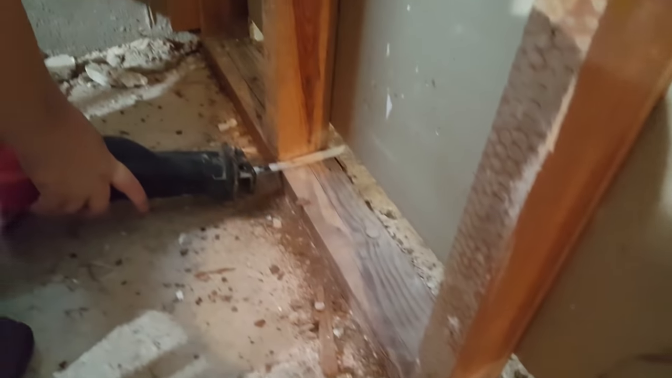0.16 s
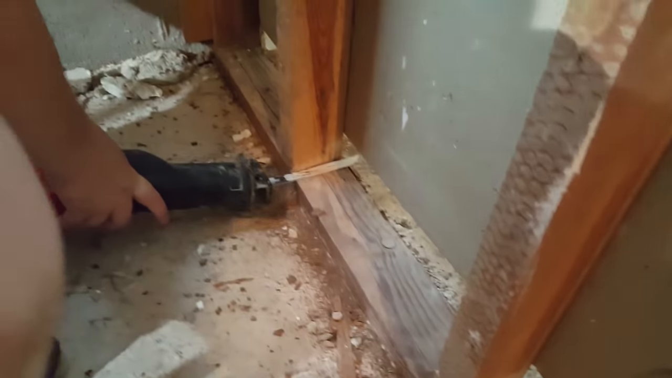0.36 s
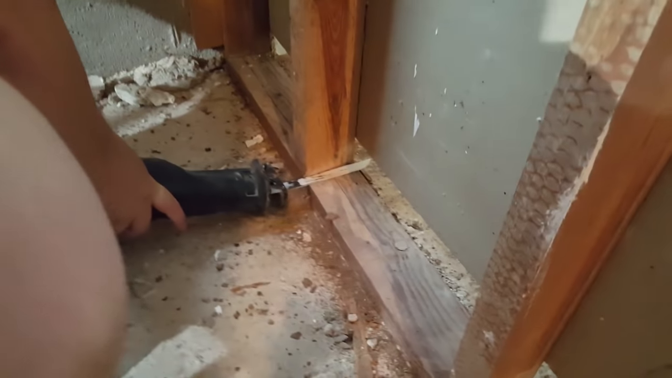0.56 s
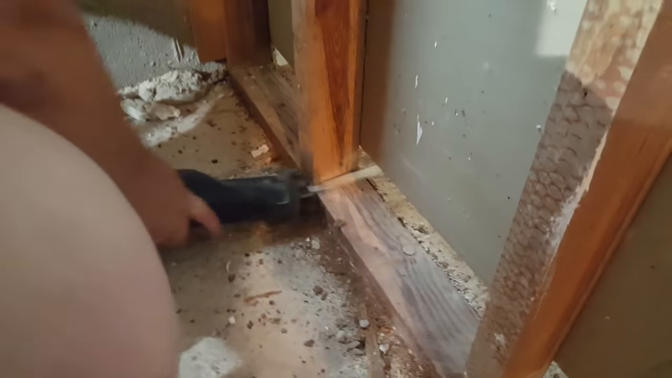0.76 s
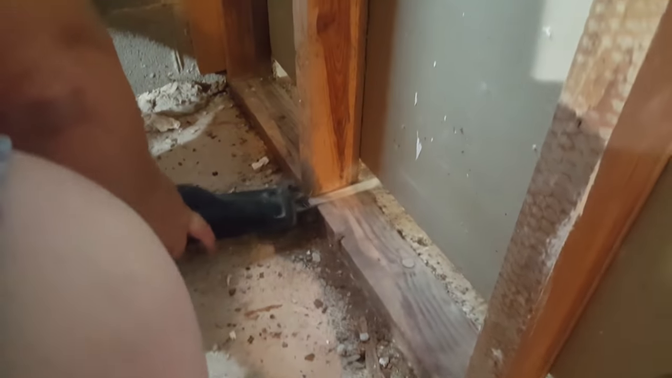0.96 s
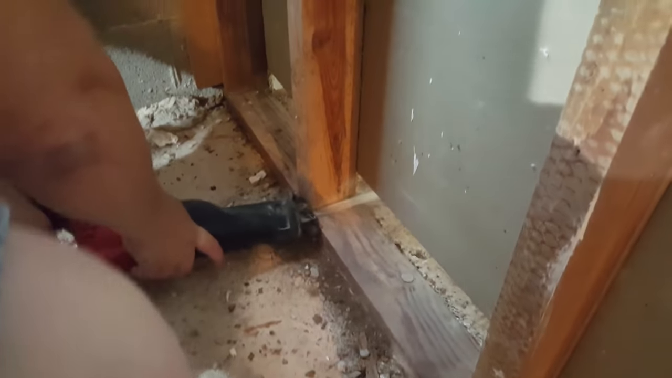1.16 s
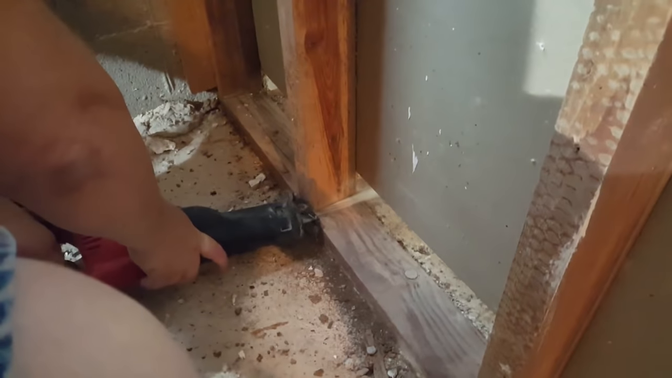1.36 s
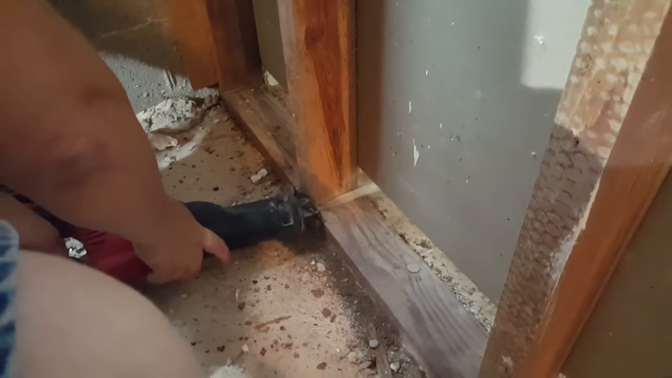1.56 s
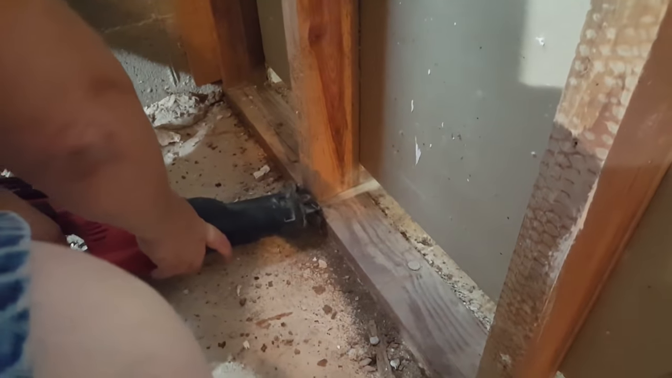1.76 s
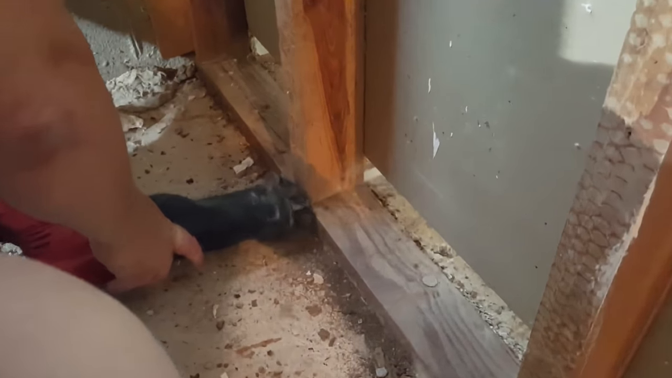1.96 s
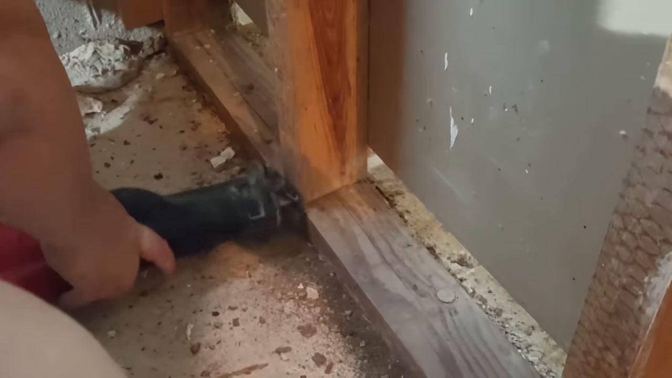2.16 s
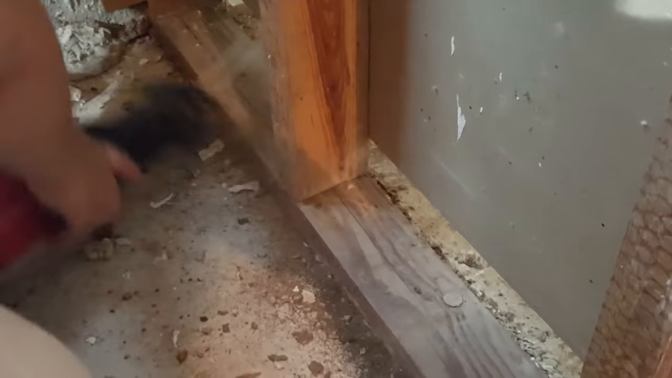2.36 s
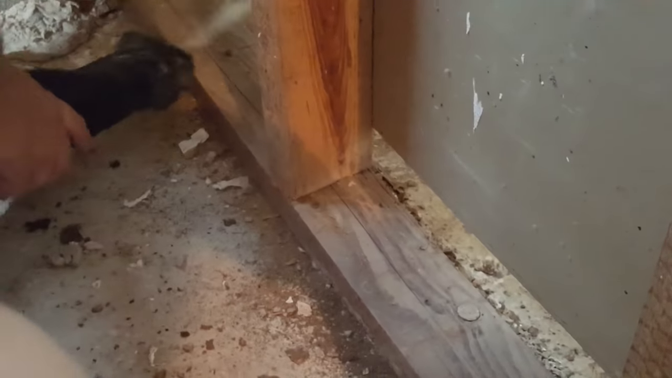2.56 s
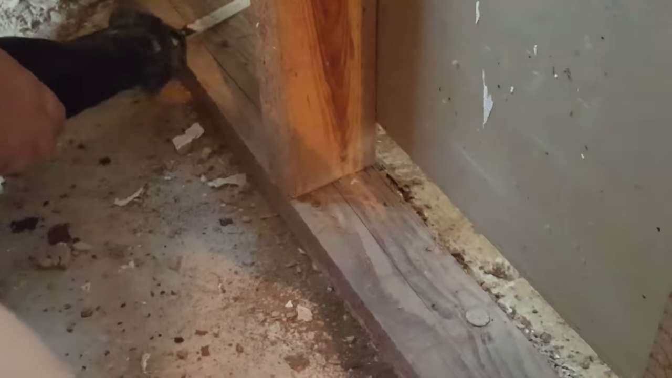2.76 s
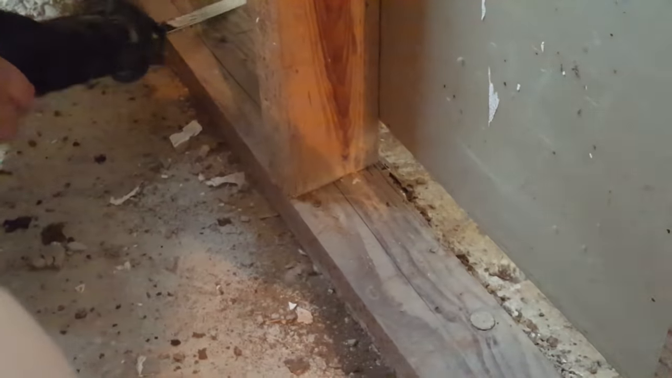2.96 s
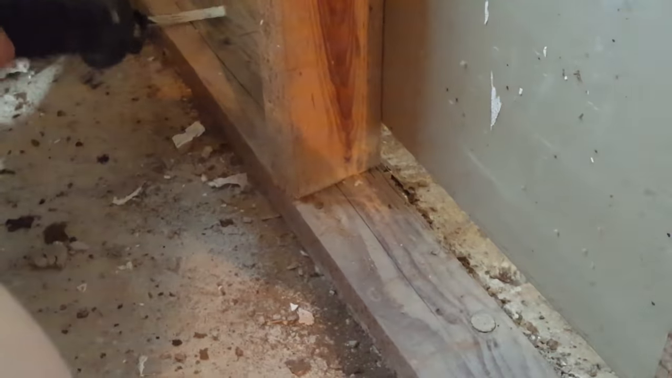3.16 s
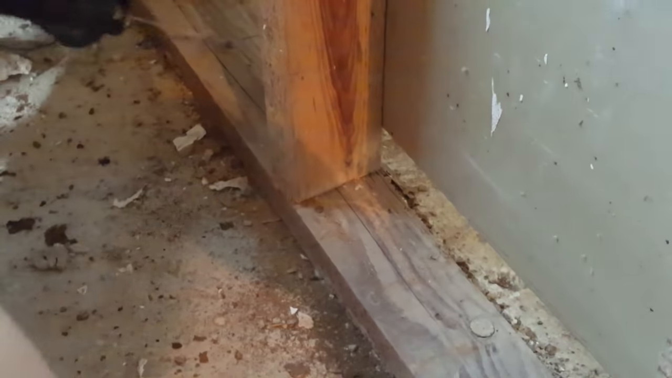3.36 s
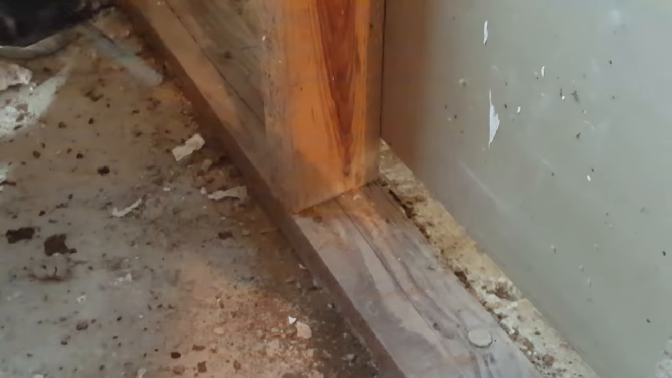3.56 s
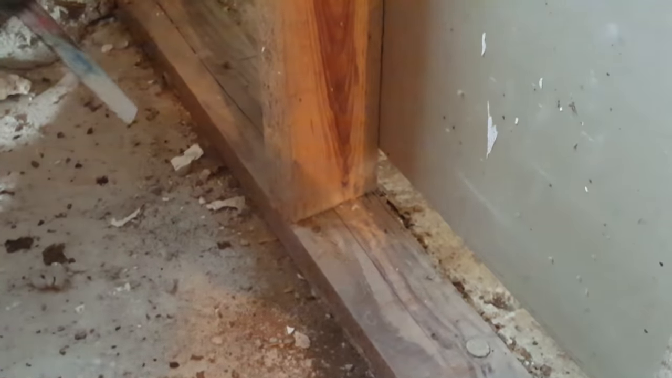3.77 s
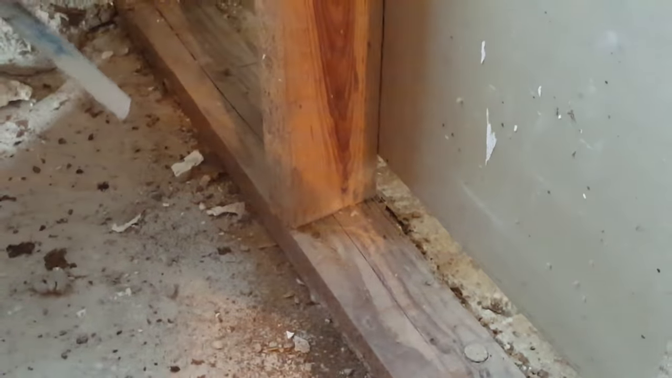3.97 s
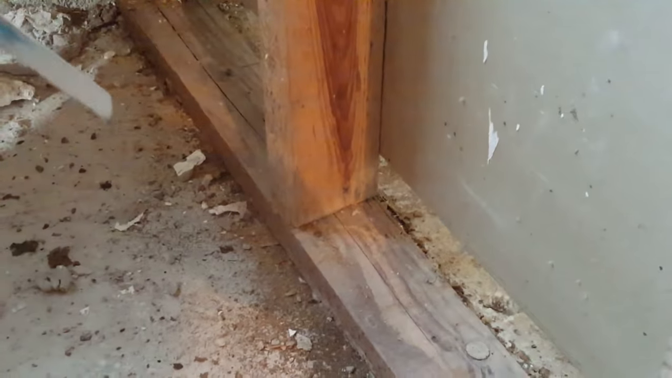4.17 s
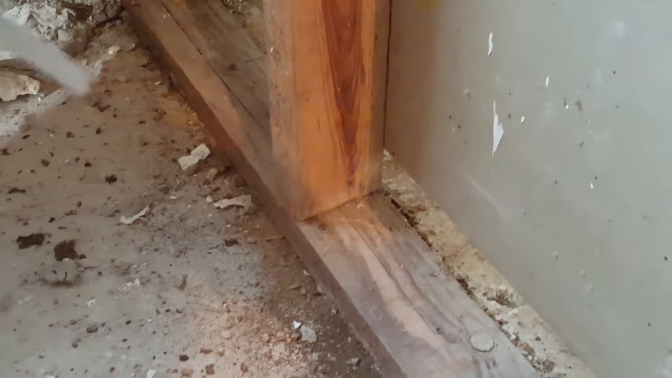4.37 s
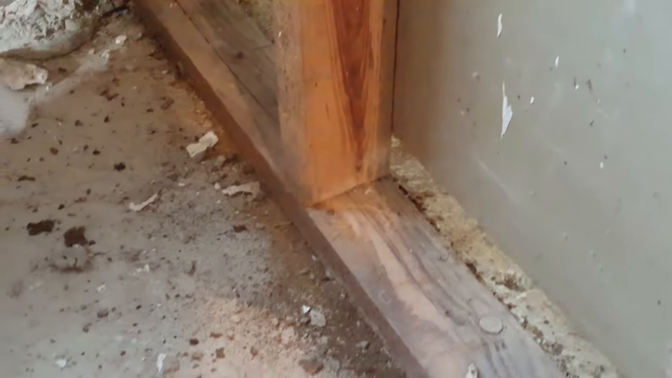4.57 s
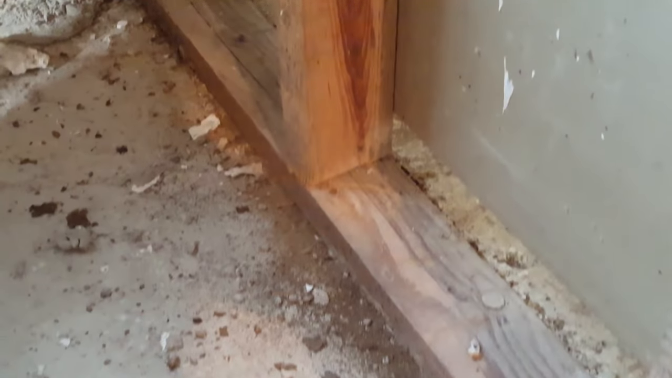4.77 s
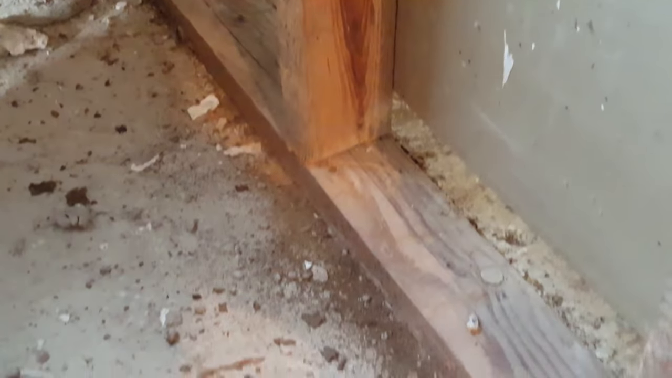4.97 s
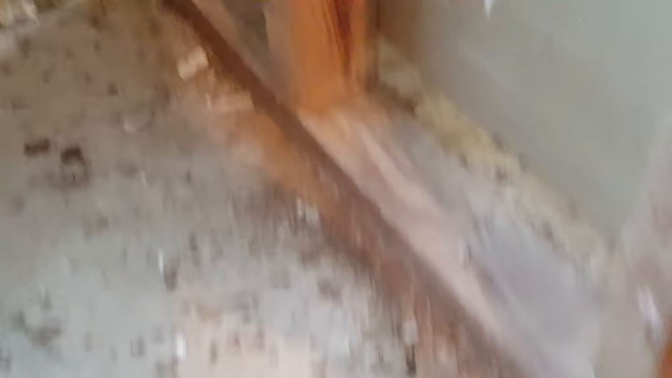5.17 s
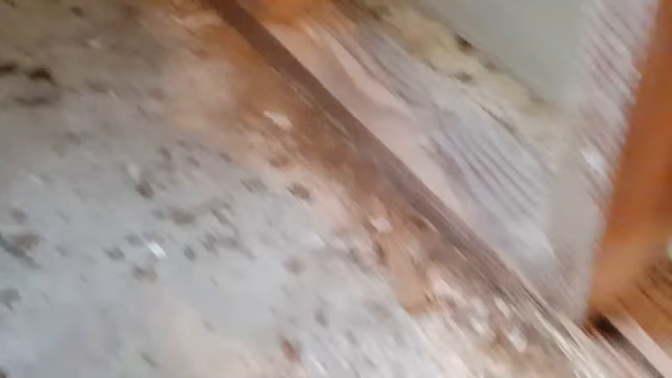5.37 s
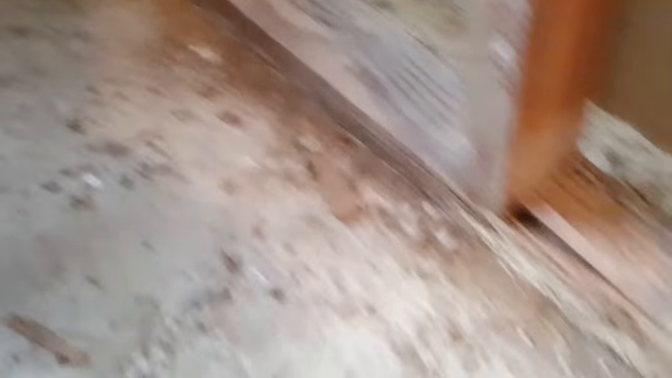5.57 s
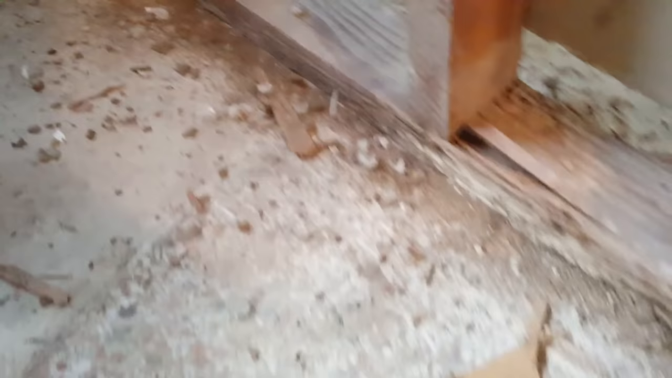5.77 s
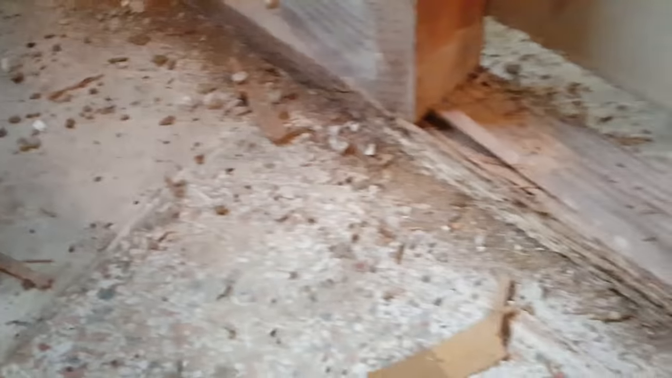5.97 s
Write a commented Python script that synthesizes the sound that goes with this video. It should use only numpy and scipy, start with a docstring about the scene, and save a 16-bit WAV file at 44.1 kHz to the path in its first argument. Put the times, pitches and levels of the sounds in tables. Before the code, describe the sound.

A bare indoor room opens with low lumpy rumble, faint hum and soft air noise, with a tiny tick near 0.26 seconds. Trigger clicks sound around 0.7, then the reciprocating saw spins up at about 0.8 with a faint high whistle and brief gear ring. From 0.88 it bites with a woody jolt: about 46 strokes per second, low stud thumps, framing buzz, harsh rasp, motor hiss and bright metal chips. It is rough at first, steadier around 1.4 to 1.7, then chattering with strong grabs from 1.8 to 2.3. The load eases into hollow gear whir; a sharp hard clack lands at 2.44. The motor brakes quickly at 2.7. From 3.1 to 4.2, small knocks, clicks and grit scuffs scatter, with short room reflections. Quiet rumble returns, with sparse ticks and drags after 5.0, the strongest scrape near 5.9.

```python
"""A reciprocating saw starts up, cuts through nails under a wall stud, runs free and stops in a bare room.
Crank strokes shake the framing near multiples of their rate and gate the stud thump, tooth rasp and motor hiss.
Tool and grit tick as crackle through knock resonances; scuffs are dense grains under short swells.
Behind them lie a low rumble, a faint hum and air noise, all filtered noise."""
import sys
import numpy as np
from scipy import signal
from scipy.fft import rfft, irfft, next_fast_len
from scipy.io import wavfile

SR = 44100
rng = np.random.default_rng(int(sys.argv[2]) if len(sys.argv) > 2 else 0)


def transcribe(u):
    """Save the signal u as a 16-bit wav file named by the first command-line argument.

    u: samples, shape (n,) or (channels, n), limited to [-1, 1]; the rate is SR.
    q: integer samples, one column per channel.
    """
    v = np.clip(np.atleast_2d(u).T, -1, 1)
    q = np.round(v * 32767).astype(np.int16)
    wavfile.write(sys.argv[1], SR, q)


def how_loud(loudness_db):
    """Turn decibels into a plain amplitude multiplier (0 dB gives 1, 20 dB gives 10)."""
    steps = np.asarray(loudness_db, float) / 20
    return 10 ** steps


N = 265923
TIME = np.arange(N) / SR

TRIGGER_S, FULL_S = 0.773, 0.8506   # trigger pulled, motor at speed
# tooth rasp spectrum: hz, relative_db
RASP = [(210, -42), (350, -51), (548, -9), (644, -2), (1090, -6), (1360, -3), (2250, -9.5), (2780, -20),
        (3300, -9.5), (4500, -6.5), (5850, -34), (9900, -120)]


def rms_one(x):
    """Scale to rms 1."""
    return x / np.sqrt(np.mean(x ** 2) + 1e-20)


def in_time(rows):
    """Columns of a curve at every sample."""
    s, *columns = np.transpose(rows)
    return [np.interp(TIME, s, c) for c in columns]


def colour(x, points):
    """Filter by a dB curve over log frequency."""
    size = next_fast_len(N + SR // 4)
    hz, db = np.transpose(points)
    grid = np.maximum(np.arange(size // 2 + 1) * SR / size, 1)
    gain = how_loud(np.interp(np.log(grid), np.log(hz), db))
    return irfft(rfft(x, size) * gain, size)[..., :N]


def noise():
    """White noise along two unrelated paths: straight ahead and sideways."""
    return rng.standard_normal((2, N))


def drift(rate_hz):
    """Random wander of rms 1: noise through two equal low-pass poles."""
    r = np.exp(-2 * np.pi * rate_hz / SR)
    wander = signal.lfilter([1], [1, -2 * r, r * r], rng.standard_normal(N + SR))
    return rms_one(wander[SR:])   # settled part


def resonance(x, hz, width_hz):
    """Two-pole peak with gain 1 on top."""
    r = np.exp(-np.pi * width_hz / SR)
    poles = [1, -2 * r * np.cos(2 * np.pi * hz / SR), r * r]
    return signal.lfilter([(1 - r * r) / 2, 0, (r * r - 1) / 2], poles, x)


def grains(per_s, spread_db):
    """Random clicks of uneven size, with independent signs on the two paths."""
    sizes = how_loud(spread_db * np.minimum(rng.exponential(1, N), 4)) * rng.choice([-1, 1], (2, N))
    return sizes * (rng.random(N) < per_s / SR)


def swell(start_s, rise_s, hold_s, fall_s, db, range_db=25):
    """Gain that rises, holds and falls, straight in dB over the given range."""
    turns_s = np.cumsum([start_s - .004, .004, rise_s, hold_s, fall_s, fall_s])
    return how_loud(db + np.interp(TIME, turns_s, [-90, -range_db, 0, 0, -range_db, -90]))


def saw():
    """Crank strokes drive a regular shake and gate the thump, the rasp and the motor hiss."""
    # the cut: time_s, load_db (rasp level), steadiness (0-1), jamming (0-1)
    cut = [(.8, -13, 1, 0), (.875, -24.5, 0.56, 0), (.89, -11.5, 0.64, 0), (.92, -23, 0.28, 0.8),
           (.97, -19, 0.55, 0.3), (1.05, -18, 0.27, 0.05), (1.25, -18.5, 0.61, 0.62),
           (1.45, -16.5, 0.81, 0.08), (1.65, -16.5, 0.76, 0.1), (1.85, -18, 0.66, 0.33),
           (2.05, -23, 0.44, 0.54), (2.2, -21, 0.6, 0.56), (2.36, -27, 0.8, 0.33), (2.45, -28.5, 0.44, 0),
           (2.58, -52, 0.69, 0.2), (2.7, -44, 0.55, 0.4), (2.8, -25, 0.8, 1)]
    mean_load_db, catch_s = -17, .882   # the steady thump and rasp begin at catch_s
    load_db, steady, jam = in_time(cut)
    steady = np.clip(steady, 0, 1)
    extra_db = load_db - mean_load_db
    on_db = power_db()
    strokes = stroke_count()
    depth_db = 21 * (1 - steady)   # unsteady strokes bite in stronger bursts
    burst_db = stroke_bursts(strokes, depth_db, jam)
    running, cutting = TIME > TRIGGER_S, TIME > catch_s

    shake = framing_shake(strokes, on_db, extra_db, steady)
    thump = stud_thump(burst_db, on_db, extra_db, steady, jam)
    body = cutting * (thump + how_loud(on_db + load_db) * rasp(strokes, burst_db, steady))
    motor = motor_hiss(burst_db, depth_db, on_db, extra_db)
    body = body - low_mid_loss(body + motor)
    chip_gain = how_loud(on_db + extra_db) * (1 - steady) * cutting
    tool = running * (body + motor + chip_gain * chips(how_loud(burst_db)))
    tool = tool + grabs() + free_running() + jolts() + switch_whistle() + gear_ring()
    return tool, running * shake


def power_db():
    """Motor power in dB under full: spin-up, run, quick braking with a slower tail."""
    release_s, spin_up_db = 2.6964, 39
    after_s = np.maximum(TIME - release_s, 0)
    down_db = np.maximum(-306 * after_s, -30 - 84 * after_s)   # slopes in dB per s
    return np.interp(TIME, [TRIGGER_S, FULL_S], [-spin_up_db, 0]) + down_db


def stroke_count():
    """Crank position in strokes: the integral of crank speed."""
    # crank speed: time_s, strokes_per_s
    speed = [(0.85, 41.4), (0.954, 46.3), (1.0, 48), (1.082, 46.6), (1.5, 46.5), (1.828, 46.3),
             (2.072, 44.7), (2.352, 44.3), (2.75, 45)]
    start_cycle = 0.027
    return start_cycle + np.cumsum(in_time(speed)[0]) / SR


def stroke_bursts(strokes, depth_db, jam):
    """Level pattern of each stroke as the blade bites; alternate strokes differ when it jams."""
    # one stroke cycle: cycle_share (0-1), bite (0-1)
    bite_cycle = [(0, .1), (.14, 0.3), (.3, 1.), (.42, .5), (.55, 0.6), (.7, 0.7), (0.818, 0.67),
                  (.92, 0.6)]
    contrast_db = 2
    share, bite = np.transpose(bite_cycle)
    burst_db = depth_db * (np.interp(strokes, share, bite, period=1) - .4)
    return burst_db + contrast_db * jam * np.cos(np.pi * strokes + 1.45)   # every second stroke jams harder


def framing_shake(strokes, on_db, extra_db, steady):
    """Wavering sines locked to the crank; the framing answers other multiples as the blade sinks in."""
    # shake lines: stroke_rate_multiple, early_db, late_db
    lines = [(0.96, 3.5, 3.5), (2.01, -6.5, -6.5), (3, -9, -3.5), (4.05, -3.5, 0.5), (4.995, -0.5, -13),
             (6.05, -9, -2.5), (7, -25, -10.5), (8.04, -2, -21), (8.9, -13.5, -6.5), (10.07, -7.5, -1.5),
             (11.09, -5, -8), (12.15, -3, -6), (13.07, -3, -3), (13.92, -8, 6), (16, -5, 0.5),
             (18.37, -12, -9), (19.5, -4, -5), (21.06, -6, 3.5)]
    early_s, late_s, high_order = 1.433, 1.59, 12
    low_db = 2 * on_db + extra_db - 40 + 25.5 * steady
    high_db = 2 * on_db + extra_db - 31.5 + 5.5 * steady
    shake = 0
    for k, early_db, late_db in lines:
        level_db = np.interp(TIME, [early_s, late_s], [early_db, late_db]) + 2.2 * drift(5.)
        level_db = level_db + (low_db if k < high_order else high_db)
        phase_cycles = rng.random((2, 1))   # one per path
        shake = shake + how_loud(level_db) * np.sin(2 * np.pi * (k * strokes + phase_cycles))
    return shake


def stud_thump(burst_db, on_db, extra_db, steady, jam):
    """Low noise in stroke bursts: load and jamming raise it, steady strokes thump less."""
    # thump spectrum: hz, relative_db
    spectrum = [(35, -41), (60, -1), (173, 7), (201, 4.5), (233, 3), (520, -3), (680, -28), (1140, -120)]
    level_db = on_db - 18.5 + 0.52 * extra_db - 9 * steady + 8 * (jam - .5)
    return how_loud(level_db) * rms_one(colour(noise() * how_loud(1.16 * burst_db + 0.3 * drift(70.0)), spectrum))


def rasp(strokes, burst_db, steady):
    """Random tooth clicks plus a repeating pattern in steady strokes, ringing the flexing blade."""
    teeth = rms_one(grains(2500., 3.0)) + 1.23 * steady ** 2 * repeating(strokes)
    teeth = chatter(teeth * how_loud(1.17 * burst_db + 2.0 * drift(36.0)))
    return rms_one(colour(teeth, RASP))


def repeating(strokes):
    """A steady stroke drags the same teeth over the same metal: one rasp pattern returns for a few strokes."""
    pattern_samples, lasts_strokes = 950, 7
    patterns = rng.standard_normal((2, int(strokes[-1]) // lasts_strokes + 1, pattern_samples))
    place = (strokes % 1 * pattern_samples).astype(int)
    return patterns[:, strokes.astype(int) // lasts_strokes, place]


def chatter(teeth):
    """The flexing blade rings at many pitches that come and go, besides its lasting resonances."""
    # blade and stud resonances: pitch_hz, width_hz, gain_db
    modes = [(660, 35, -2), (1260, 60, -1), (1630, 45, -1)]
    passing = sum(how_loud(5.5 * drift(12.)) * resonance(teeth, hz, .06 * hz)
                  for hz in np.geomspace(520, 2600, num=14))
    lasting = sum(how_loud(db) * resonance(teeth, hz, width_hz) for hz, width_hz, db in modes)
    return 0.87 * teeth + passing + 0.7 * lasting


def motor_hiss(burst_db, depth_db, on_db, extra_db):
    """Flickering noise, gated by the strokes; it rises with load as the motor labours."""
    # hiss spectrum: hz, relative_db
    spectrum = [(120, -33), (200, -34), (316, -0.5), (347, -0.5), (647, 0.5), (1350, -2), (1560, -2.5),
                (1870, -1), (2780, -10.5), (3300, -8.5), (4040, -10.5), (4680, -12.5), (8420, -16.5),
                (10300, -29.5), (12800, -24), (16000, -32)]
    level_db = on_db - 23.5 + 0.47 * (np.clip(extra_db, -12, 0) + 9.0)
    flicker_db = .25 * depth_db * drift(110.)
    hiss = noise() * how_loud(0.75 * burst_db + flicker_db)
    return how_loud(level_db) * rms_one(colour(hiss, spectrum))


def low_mid_loss(x):
    """The low-mid share to take out of the saw: it grows until late in the cut."""
    # band taken out: hz, gain_db
    band = [(200, -39), (270, 0), (540, -0.5), (640, -32)]
    # negative hold: the fall overlaps the rise
    share = swell(start_s=0, rise_s=2.6, hold_s=-0.4, fall_s=2, db=-2.5)
    return np.minimum(share, 1) * colour(x, band)


def chips(bite):
    """Teeth snap off chips of nail, harder as the stroke bites: short bright cracks of decaying noise."""
    # crack filter: hz, gain_db
    spectrum = [(800, -30), (2500, -16), (5000, 12.5), (8500, -4.5), (10300, -23), (12800, -16),
                (16000, -38)]
    per_s, level_db, t60_s = 60, -20, .015
    t = TIME[:SR // 30]
    crack = rng.standard_normal((2, len(t))) * how_loud(-60 * t / t60_s)
    cracks = signal.fftconvolve(grains(per_s, 2.0) * bite, crack, axes=1)[:, :N]
    return how_loud(level_db) * colour(cracks, spectrum)


def grabs():
    """The blade grabs the nail hard: short bursts of tooth chatter, each around a pitch of its own."""
    # grabs: time_s, level_db, pitch_hz
    events = [(0.864, -23.5, 1300), (0.884, -16, 810), (0.964, -15, 687), (1.035, -13.5, 1000),
              (1.072, -22, 1710), (1.116, -21, 1800), (1.159, -15, 1020), (1.295, -17.5, 1320),
              (1.81, -13, 890), (1.844, -18, 1380), (1.919, -8.5, 1340), (1.971, -12.5, 1150),
              (2.018, -15, 1320), (2.059, -13.5, 937), (2.105, -15.5, 1150), (2.151, -14.5, 1250),
              (2.195, -21, 1500), (2.244, -20, 1600), (2.294, -21, 1750)]
    rise_s, hold_s, fall_s = 0.0028, 0.012, 0.027
    teeth = rms_one(colour(chatter(grains(3000., 6.2)), RASP))
    out = 0
    for s, db, hz in events:
        ringing = resonance(teeth, hz, 1.2 * hz) + 2.0 * resonance(teeth, hz, .09 * hz)
        out = out + swell(s - rise_s, rise_s, hold_s, fall_s, db, range_db=14.0) * rms_one(ringing)
    return out


def free_running():
    """Out of the cut, gear noise rings in the housing."""
    # housing resonances: pitch_hz, width_hz, relative_db
    modes = [(550, 130, -2), (950, 220, 1.5), (1273, 56, -2.5), (1815, 130, 1), (3300, 270, -2),
             (3980, 400, -1.5)]
    from_s, rise_s, base_db = 2.22, 0.23, -29   # it comes out as the blade leaves the cut
    gears = noise()
    ringing = sum(how_loud(db) * resonance(resonance(gears, hz, width_hz), hz, 3.0 * width_hz)
                  for hz, width_hz, db in modes)
    level_db = base_db + 1.2 * power_db() + 2.1 * drift(28.0)
    return np.clip((TIME - from_s) / rise_s, 0, 1) * how_loud(level_db) * rms_one(ringing)


def jolts():
    """The blade catching jolts the stud: soft contacts set its low modes ringing."""
    # jolts: time_s, drive_db
    events = [(0.885, -18), (0.894, -6.5), (0.911, -16), (0.927, -14.5), (0.944, -16.5), (2.215, -21),
              (2.297, -21), (2.357, -27)]
    # stud modes: pitch_hz, gain_db, t60_s
    modes = [(155.6, -9.5, 0.18), (191, -3, 0.22), (299, -4.5, 0.12), (360, 9.5, 0.017), (468, -1, 0.13)]
    clicks = np.zeros(N)
    for s, db in events:
        clicks[round(s * SR)] = how_loud(db)
    clicks = signal.fftconvolve(clicks, np.hanning(90) / 45)[:N]   # a soft contact
    out = 0
    for hz, db, t60_s in modes:
        r, w = how_loud(-60 / (t60_s * SR)), 2 * np.pi * hz / SR
        out = out + signal.lfilter([0, how_loud(db) * np.sin(w)], [1, -2 * r * np.cos(w), r * r], clicks + 1e-18)
    return out


def switch_whistle():
    """The speed switch whistles at start-up: a swelling sine."""
    gain = swell(start_s=.728, rise_s=.095, hold_s=.015, fall_s=.015, db=-46, range_db=11)
    return gain * np.sin(2 * np.pi * 7800 * TIME)


def gear_ring():
    """Gears ring at start-up: noise through two equal resonances under a swell."""
    hz, width_hz = 6100, 650
    ring = rms_one(resonance(resonance(noise(), hz, width_hz), hz, width_hz))
    return swell(start_s=.805, rise_s=.045, hold_s=.04, fall_s=.015, db=-27.5, range_db=20) * ring


def ticks():
    """Hard first contact, short crackle and weak rattle, heard as a ringing knock and a bright snap."""
    # ticks of tool, trigger and grit, levels ahead of the filter:
    # time_s, knock_peak_db, knock_hz, snap_db (rms over 25 ms)
    events = [(0.2587, -49, 2140, -58), (0.6823, -21.5, 950, -33.5), (0.6903, -25, 1760, -64),
              (0.711, -30, 1130, -47), (0.749, -44, 1110, -45), (0.784, -32.5, 900, -50),
              (0.788, -33, 4480, -47), (2.4372, -7, 4240, -18), (2.4387, -13, 1480, -28),
              (2.455, -22, 1800, -33), (2.887, -42, 2000, -50), (3.0967, -27, 1600, -35.5),
              (3.0971, -33, 5000, -48), (3.129, -33.5, 3060, -60), (3.161, -40, 2500, -53),
              (3.211, -40, 2900, -80), (3.2651, -17, 1880, -39.5), (3.2647, -18, 4270, -45),
              (3.272, -30, 1120, -53), (3.319, -33, 2320, -41.5), (3.339, -32.5, 1270, -51),
              (3.367, -36, 3000, -56), (3.3939, -25, 4640, -30), (3.4035, -20, 3800, -30.5),
              (3.5177, -29, 1920, -48), (3.551, -35, 2200, -48.5), (3.679, -56, 1760, -54),
              (3.7476, -28.5, 3900, -34), (3.791, -22.5, 1870, -53), (3.796, -27, 2400, -50),
              (3.8025, -30, 2300, -54), (3.918, -34.5, 1810, -53), (3.944, -36.5, 1480, -59),
              (4.001, -27, 1280, -52), (4.024, -50, 1440, -51), (4.012, -38, 1380, -60),
              (4.052, -30, 1240, -64), (4.076, -44, 1400, -57), (4.1061, -32.5, 1400, -52),
              (4.15, -36, 1330, -62), (4.198, -40.5, 930, -66), (4.753, -30, 9100, -66),
              (5.0402, -26, 3300, -45), (5.045, -31, 3260, -51), (5.059, -32.5, 2540, -61),
              (5.707, -36, 4500, -64), (5.723, -40, 2200, -51), (5.825, -38, 1900, -57),
              (6.026, -30.5, 3280, -54)]
    # tick filter: hz, gain_db
    tone = [(500, 14.5), (1000, 1.5), (2100, 0.5), (2800, -2), (4300, 2), (8000, -2), (10000, -13.5),
            (13000, -11), (16000, -23)]
    rise_s = 0.00037
    out, t = np.zeros((2, N + SR)), TIME[:SR // 6]
    bright = signal.butter(3, 4500, "high", fs=SR, output="sos")
    for s, knock_db, hz, snap_db in events + faint_ticks():
        t60_s = 0.0044 + 30.5 / hz   # duller ticks last longer
        fading = how_loud(-60 * t / max(t60_s, .005))
        fading = fading + how_loud(-13.5 - 60 * t / max(8.8 * t60_s, .02))   # weak rattle
        crackle = rng.standard_normal((2, len(t))) * fading * (1 - np.exp(-t / rise_s))
        crackle = crackle + 6.1 * (t == 0)   # first contact
        knock = resonance(resonance(crackle, hz, 0.3 * hz), hz, 2.1 * hz)
        knock = knock + 0.5 * resonance(crackle, 1340, 190.0) + 0.5 * resonance(crackle, 1000, 92.0)   # woody body
        snap = signal.sosfilt(bright, crackle * (how_loud(-60 * t / 0.061) + 0.52))
        at = round(s * SR)
        out[:, at:at + len(t)] += how_loud(knock_db) * knock / np.abs(knock[0]).max()
        out[:, at:at + len(t)] += how_loud(snap_db) * snap / snap[0, :SR // 40].std()
    return colour(out[:, :N], tone)


def faint_ticks():
    """Small grit ticks at random while the tool is handled."""
    first_s, last_s, count = 3.2, 4.4, 14
    return [(first_s + (last_s - first_s) * u, -54 + 6 * v, 1200 * 2 ** w, -63 + 5 * v)
            for u, v, w in rng.random((count, 3))]


def scuffs():
    """Shoe and cloth drag grit over concrete: dense grains, partly into a few resonances, under short swells."""
    # scuffs: start_s, rise_s, hold_s, level_db, treble_cut_hz, debris_ring_gain
    events = [(3.11, .02, 0.082, -55, 6000, 0.17), (3.24, 0.014, 0.098, -53, 6000, .2),
              (3.373, 0.07, 0.11, -51.5, 9000, 0.1), (3.555, 0.092, 0.64, -63, 14900, 0.2),
              (3.967, 0.033, 0.17, -53.5, 1800, 0.66), (4.124, 0.043, 0.056, -58.5, 15000, 0.3),
              (4.379, .015, 0.017, -46.5, 1400, 1), (5.008, 0.016, 0.04, -51.5, 4970, 0.7),
              (5.5, 0.073, 0.027, -47.5, 15000, 1), (5.633, 0.051, 0.043, -52, 15000, 0.6),
              (5.76, 0.055, 0.049, -56, 9000, .2), (5.885, 0.018, 0.052, -36, 15000, 2.2),
              (6.002, 0.017, .02, -48, 4000, .3)]
    # scuff spectrum: hz, relative_db
    spectrum = [(350, -46), (600, -41), (789, -14), (1420, -17.5), (2140, -12.5), (8080, -21), (15800, -39)]
    # resonances of the dragged debris: pitch_hz, width_hz, gain_db
    modes = [(840, 150, 1.5), (1660, 100, 2.5), (2170, 110, 1), (2900, 69, 1.5), (3240, 60, -2),
             (4100, 170, 2), (5230, 60, -1.5)]
    grit = grains(4000., 0.84) * how_loud(0.23 * drift(50.))
    ringing = sum(how_loud(db) * resonance(grit, hz, width_hz) for hz, width_hz, db in modes)
    ringing = colour(0.73 * ringing, spectrum)
    grit = colour(grit, spectrum)
    out = 0
    for s, rise_s, hold_s, db, cut_hz, ring in events:
        dull = signal.butter(2, cut_hz, fs=SR, output="sos")
        drag = rms_one(signal.sosfilt(dull, grit + max(ring, 0) * ringing))
        out = out + swell(s, rise_s, hold_s, 0.096, db) * drag
    return out


def room_tail(dry):
    """Reflections off the walls: the sound convolved with dying noise of energy 1, then coloured."""
    # wall return: hz, gain_db
    walls = [(150, 3.5), (500, 1), (2000, -5), (8000, -10)]
    t60_s, level_db = 0.67, -6.5
    t = TIME[:SR // 2]
    tail = rng.standard_normal(len(t)) * how_loud(-60 * t / t60_s)
    tail = tail / np.sqrt(np.sum(tail ** 2))
    return how_loud(level_db) * colour(signal.fftconvolve(dry, [tail])[:, :N], walls)


def room_tone():
    """Lumpy low rumble with a faint hum, under smooth air noise; both sink under the saw and creep back."""
    # rumble spectrum: hz, relative_db
    rumble_spectrum = [(18, -64), (30, 9), (41, -33), (58, 0), (146, -0.5), (226, -8.5), (250, -14.5),
                       (346, -15), (461, -67), (523, -33), (1320, -120)]
    # air spectrum: hz, relative_db
    air_spectrum = [(240, -35), (400, -1.5), (460, -8.5), (520, -3.5), (562, -4.5), (765, -10),
                    (1290, -12.5), (2180, -13), (3210, -21), (7870, -31), (9180, -40.5), (16000, -40)]
    back_at_s, back_tau_s = 3.12, 0.26
    sunk = (TIME > FULL_S) * np.exp(-np.maximum(TIME - back_at_s, 0) / back_tau_s)
    rumble = rms_one(colour(noise(), rumble_spectrum)) * how_loud(0.8 * drift(8.0))
    hum = how_loud(-12) * rms_one(resonance(noise(), hz=224.7, width_hz=2.6))
    air = rms_one(colour(noise(), air_spectrum)) * how_loud(0.7 * drift(1.5))
    return how_loud(-32.5 - 11.5 * sunk) * (rumble + hum) + how_loud(-49.5 - 5.5 * sunk) * air


def scene():
    """The room adds a tail, the framing shake arrives dry; the sideways path, weak in the bass, spreads the sound."""
    # sideways path filter: hz, gain_db
    width = [(60, -22), (150, -24.5), (380, -6.5), (600, -10), (950, -3), (2380, 0), (5980, -0.5),
             (15000, 0)]
    # stereo lean: hz, left_minus_right_db
    lean = [(60, 0), (300, 0), (1200, 1), (2500, 0.2), (6000, -1), (15000, -3.5)]
    cutting, shake = saw()
    dry = cutting + ticks() + scuffs()
    mid, side = dry + room_tail(dry) + shake + room_tone()
    side = colour(side, width)
    left = colour(mid + side, [(hz, db / 2) for hz, db in lean])
    right = colour(mid - side, [(hz, -db / 2) for hz, db in lean])
    return np.array([left, right])


def top_cut(x):
    """Nothing passes above the cut-off."""
    return signal.sosfilt(signal.butter(12, 16250, fs=SR, output="sos"), x)


def record(dry):
    """The microphone cuts the deep bass; peaks are rounded near full scale."""
    low_cut_hz = 58.3
    dry = signal.sosfilt(signal.butter(4, low_cut_hz, "high", fs=SR, output="sos"), dry)
    mix = 1.052 * np.tanh(dry / 1.172)
    return top_cut(mix)


dry = scene()
out = record(dry)
transcribe(out)
```